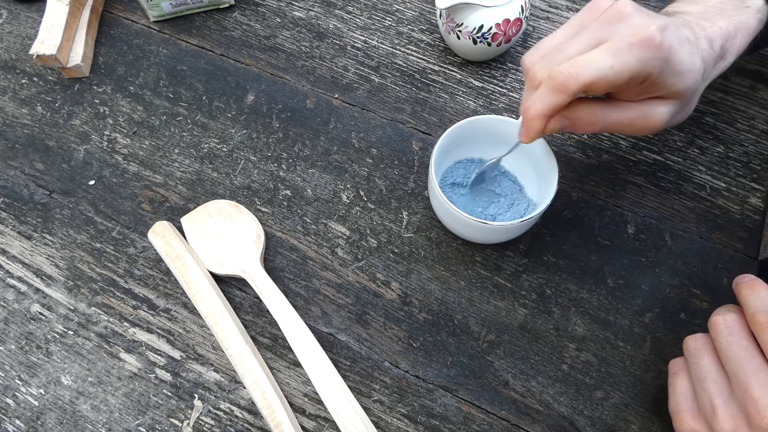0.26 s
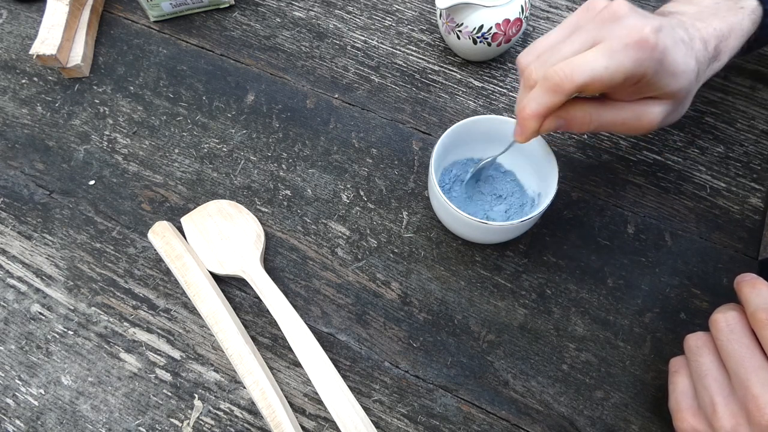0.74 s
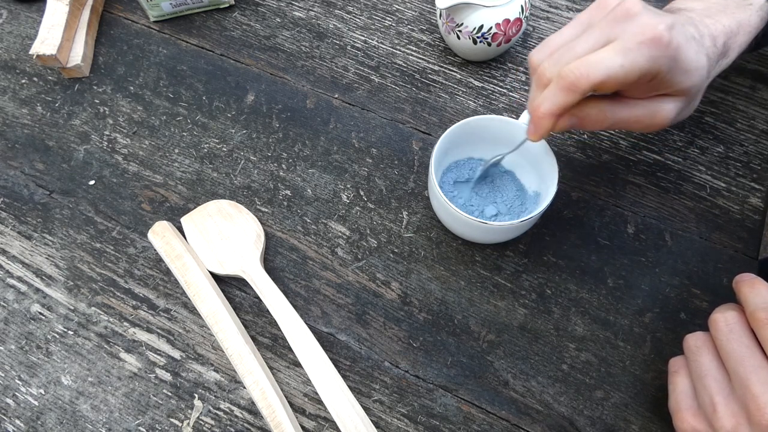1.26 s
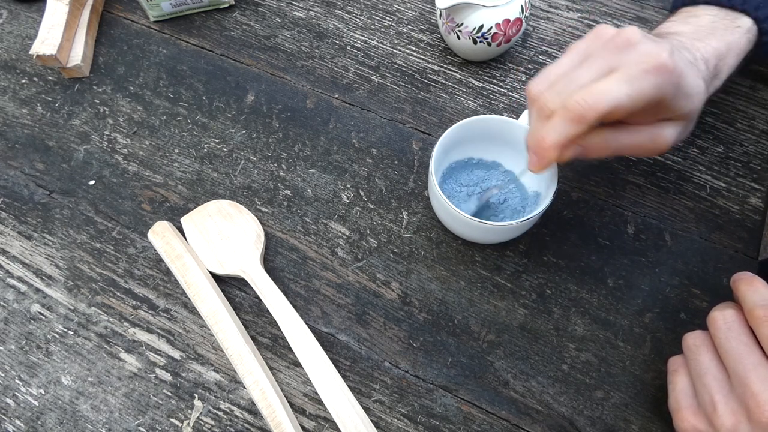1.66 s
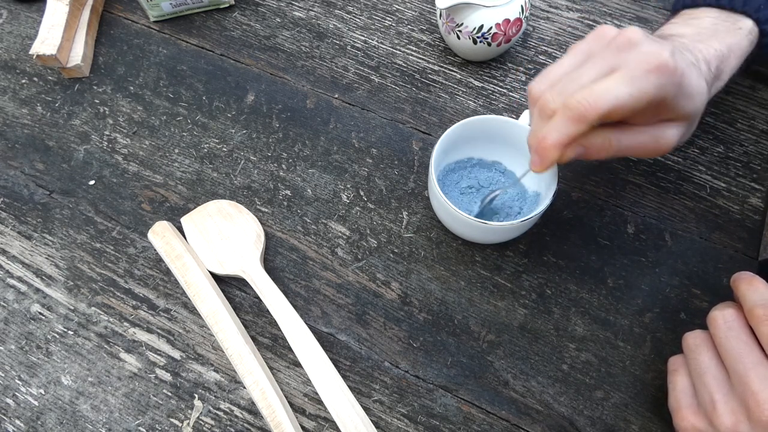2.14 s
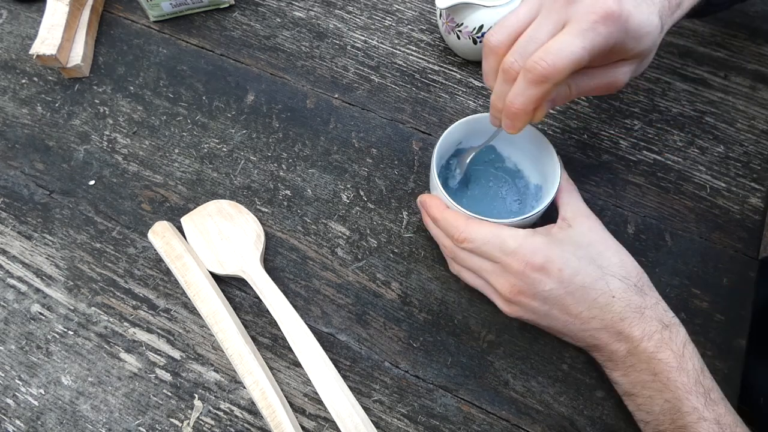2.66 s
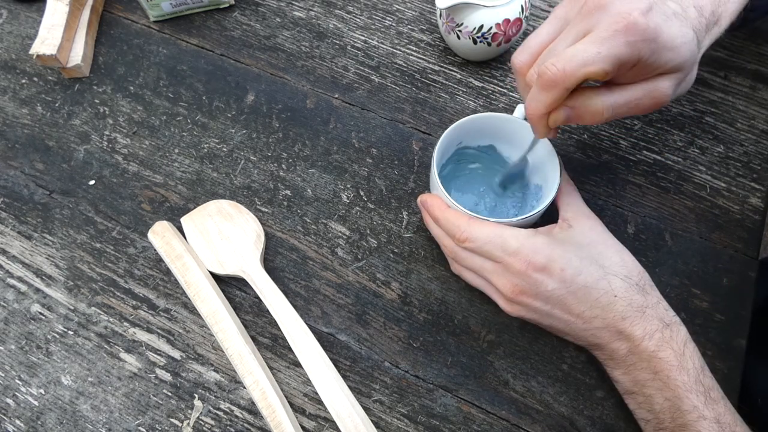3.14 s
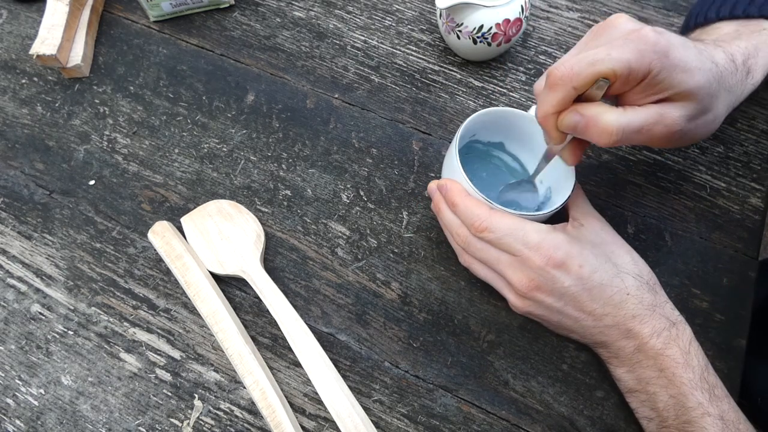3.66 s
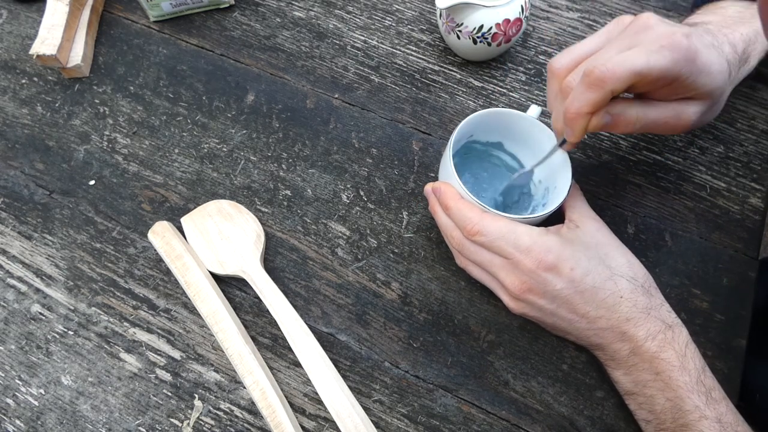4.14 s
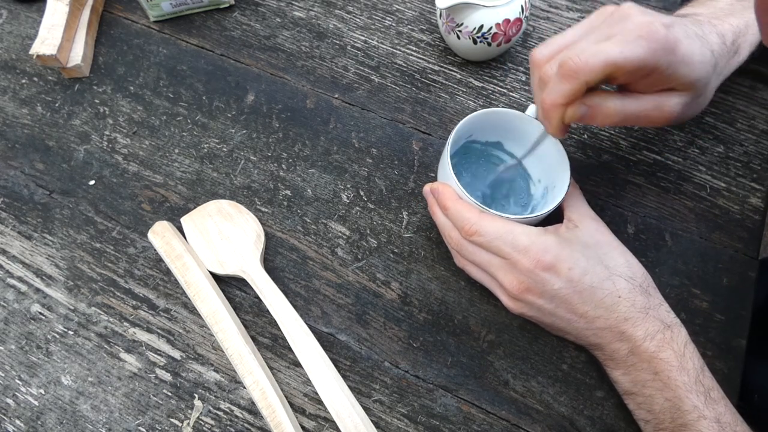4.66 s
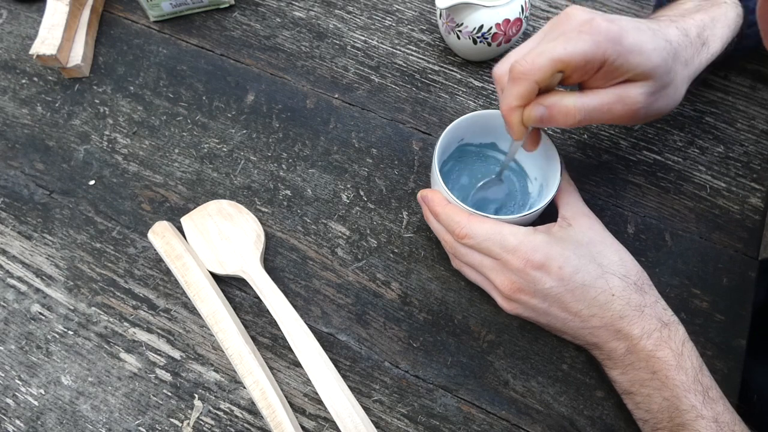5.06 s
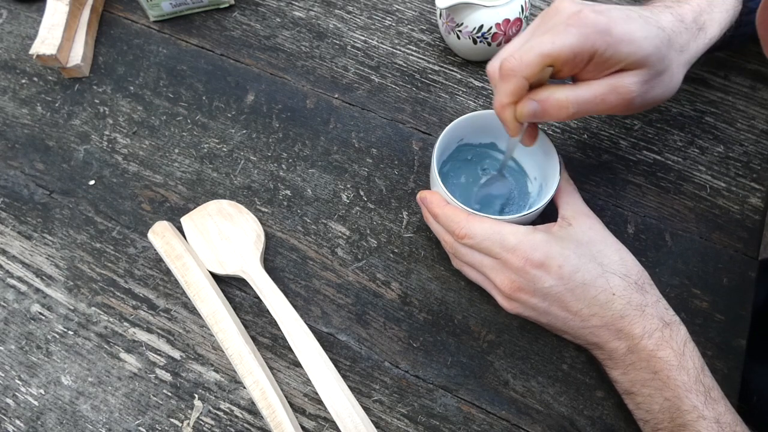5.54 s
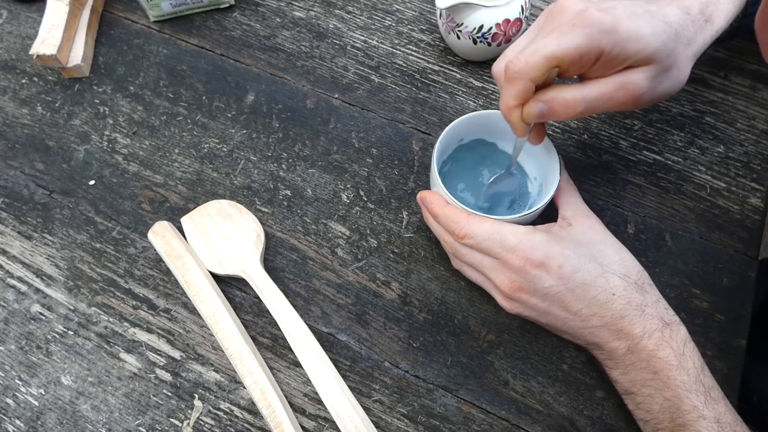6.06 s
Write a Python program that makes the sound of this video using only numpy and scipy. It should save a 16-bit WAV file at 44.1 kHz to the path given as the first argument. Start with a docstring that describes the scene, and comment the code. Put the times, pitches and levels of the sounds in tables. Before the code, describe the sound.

Dry, crisp scraping of a spoon in a china cup, about eight strokes a second, gives way to slower wet scraping and a few strong clinks damped by a holding hand. Small woody thumps come from the cup rocking on the table. A warbler sings clear, quick descending notes in the middle, then soft regular stirring returns. Near stereo pickup in a quiet garden, with faint distant engine drone.

```python
"""In a garden, a steel teaspoon stirs powder into a paste in a small china cup on a wooden table.
Random clicks of grit, shaped by moving resonances, make the spoon rasp and sing to and fro.
Gliding tones squeak, filtered noise skates and skids, and damped sines clink and knock on the boards.
A warbler of gliding sine notes sings one falling phrase over a faint outdoor rumble and engine drone."""
import sys
import numpy as np
from scipy import signal
from scipy.fft import rfft, irfft
from scipy.io import wavfile
from scipy.ndimage import uniform_filter1d

SR = 44100
rng = np.random.default_rng(int(sys.argv[2]) if len(sys.argv) > 2 else 0)


def int16_out(signal):
    """Quantize to a 16-bit WAV file."""
    q = np.round(np.clip(np.atleast_2d(signal).T, -1, 1) * 32767)
    wavfile.write(sys.argv[1], SR, q.astype(np.int16))


N = 278120

TIME = np.arange(N) / SR
AGE = np.arange(SR // 3) / SR   # seconds since a blow
WETTED_S = 2.53   # from here on the powder is a paste
GRIP_S = 2.7   # a hand closes round the cup and steadies it
# ways the cup's foot vibrates on the boards: (pitch_hz, relative level_db, time to fall 60 dB_s)
FOOT_MODES = [(1089, 5, 0.014), (1276, 7, 0.012), (1648, 4, 0.0056), (1228, -11.5, 0.046)]


def stirring(stirs):
    """Every stroke crushes grit, makes the spoon sing and the cup's foot chatter on the table."""
    # single scrapes outside the even beat, hard and soft: (middle_s, level_db, half_length_s)
    scrapes = [(0.0, -54, 0.012), (0.89, -55, 0.022), (1.473, -59, 0.0071), (1.972, -52, 0.029),
               (2.185, -58, 0.043), (2.523, -53.5, 0.03), (2.821, -52.5, 0.035), (2.973, -49.5, 0.005),
               (3.138, -57, 0.012), (3.209, -46.5, 0.012), (3.436, -63.5, 0.021), (3.69, -62.5, 0.051),
               (4.137, -62, 0.06), (4.453, -57, 0.021), (6.144, -63, 0.012)]
    # steady drag between the strokes: (time_s, level_db)
    drag = [(0.0, -63.5), (0.9, -68), (1.35, -54), (1.7, -62.5), (2.1, -66), (2.7, -72), (3.15, -58),
            (3.55, -63.5), (3.9, -72.5), (4.5, -69), (5.2, -69.5), (6.1, -67.5), (6.31, -72.5)]
    # rasp of dry powder and of wet paste: (pitch_hz, relative level_db per Hz)
    powder = [(1500, -3.5), (2100, -0.5), (2950, 3.5), (3600, -2), (4650, 4), (5300, 1.5), (6100, -0.5),
              (7300, -6), (9800, -3), (11200, -11.5), (12400, -4), (14000, -42), (16000, -42)]
    paste = [(1500, 0), (2200, 4.5), (3000, 0.5), (3800, 0), (4700, 5.5), (5400, 3.5), (6400, 3.5),
             (7700, -4), (9800, -1), (12300, -10), (14000, -16), (16000, -35)]
    # resonances of the spoon in dry powder, then in paste: (pitch_hz, width_hz, relative level_db)
    dry_push = [(4580, 250, 0.5), (5800, 230, 0.5), (10100, 600, -8)]
    dry_pull = [(2870, 240, 4.5), (4420, 610, -1.5), (6070, 140, -1.5), (12400, 380, -6.5)]
    wet_push = [(2840, 310, 1), (4520, 620, -0.5), (5840, 470, 2), (9500, 1000, -0.5)]
    wet_pull = [(2110, 340, 1), (2900, 230, 6), (4520, 400, -5), (6380, 600, -2), (8640, 400, -8)]
    power = np.zeros((2, N))   # of pulls and of pushes; a scrape is half of each
    for s, db, rise, fall, pushed in stirs:
        power[pushed] += swell(s, db, rise, fall)
    for s, db, half_length in scrapes:
        power += swell(s, db, half_length, half_length) / 2
    stroke_level = np.sqrt(power.sum(axis=0))
    wet = np.clip((TIME - WETTED_S) * 10, 0, 1)
    dry = 1 - wet

    grit = patchy(grains(per_s=6000, spread_db=3.8))
    rasp = dry * from_db(-4.5) * colour(grit, powder) + wet * from_db(-3.0) * colour(grit, paste)
    grinding = np.sqrt(power.sum(axis=0) + from_db(in_time(drag)[0]) ** 2)
    rasp *= grinding * from_db(2.1 * drift(150))

    # the boards rumble as dry powder is ground
    rumble = rms_one(band(grains(per_s=670, spread_db=1.0), 162, 385)) * grinding * from_db(-5.5) * dry

    pull, push = np.sqrt(power)
    slips = grains(per_s=1500, spread_db=1.5)
    dry_singing = push * resonate(slips, dry_push) + pull * resonate(slips, dry_pull)
    wet_singing = push * resonate(slips, wet_push) + pull * resonate(slips, wet_pull)
    singing = dry * from_db(-4.5) * dry_singing + wet * from_db(-2) * wet_singing

    # the foot chatters at chatter_db under a stroke of firm_db; growth is in dB per dB of stroke
    chatter_db, firm_db, growth = -55.5, -53, 1.23
    chatter = rms_one(signal.fftconvolve(grains(per_s=900, spread_db=6.5), struck(FOOT_MODES))[:N])
    force = stroke_level / from_db(firm_db)
    return rasp + singing + rumble + chatter * from_db(chatter_db) * force ** growth


def strokes():
    """Even strokes, pull and push in turn: rows of (s, level dB, rise s, fall s, 1 if pushed)."""
    # spells of even stirring: (first_stroke_s, end_s, period_s, level_db, rise_s, pull_fall_s, push_fall_s)
    spells = [(0.142, 2.2, .1235, -55.5, 0.031, 0.02, 0.027), (4.769, 6.14, .119, -56, 0.04, 0.0018, 0.011)]
    push_softer_db, spread_db = 0.04, .5
    rows = []
    for first, end, period, db, rise, pull_fall, push_fall in spells:
        for k, s in enumerate(np.arange(first, end, period)):
            pushed = k % 2
            level_db = db - push_softer_db * pushed + spread_db * rng.standard_normal()
            rows.append((s, level_db, rise, push_fall if pushed else pull_fall, pushed))
    return rows


def swell(s, db, rise, fall):
    """Power of one movement of the spoon: a bell with its own rise and fall."""
    distance = (TIME - s) / np.where(TIME < s, rise, fall)
    return from_db(db) ** 2 * np.exp(-np.minimum(distance ** 2, 50))


def grains(per_s, spread_db):
    """Grit cracking under the spoon: random clicks of uneven size."""
    sizes = from_db(spread_db * np.minimum(rng.exponential(1, N), 4)) * rng.choice([-1, 1], N)
    return sizes * (rng.random(N) < per_s / SR)


def patchy(x):
    """Each band of the rasp swells and fades by itself as lumps break up."""
    edges_hz = [900, 2000, 3400, 5200, 7200, 9200, 11400, 17000]
    spread_db, changes_per_s = 2.6, 60
    out = np.zeros(N)
    for k, (low, high) in enumerate(zip(edges_hz, edges_hz[1:])):
        out += band(x, low, high) * from_db(spread_db * drift(changes_per_s)) * (-1) ** k
    return out


def resonate(x, resonances):
    """Parallel resonances wander, swell and fade as the point of contact moves; rms 1."""
    shift = 1 + 0.022 * drift(22)
    out = np.zeros(N)
    for hz, width, db in resonances:
        out += sweep(x, hz * shift, width) * from_db(db + 4 * drift(35))
    return rms_one(out)


def clinks():
    """Hits and light touches of the spoon on the wall, each struck afresh."""
    # (start_s, tick_level_db, tick_pitch_hz, ting_level_db, ting_pitch_hz, ting time to fall 60 dB_s,
    # ring_level_db); the levels are before the blend in clink()
    contacts = [(0.008, -52.5, 4500, -65, 5800, .008, -73), (0.1482, -69, 2970, -60, 6100, .04, -86),
                (0.2505, -71, 4600, -50.5, 6100, .008, -80), (0.3072, -59, 3030, -51, 5900, .008, -72),
                (0.378, -56, 2980, -58, 6140, 0.083, -71), (0.474, -54.5, 2880, -56, 6250, .008, -77),
                (0.746, -64, 4600, -56, 6000, .03, -80), (0.998, -49, 4770, -51, 6300, 0.013, -87),
                (1.223, -42.5, 2700, -51, 5500, .008, -83), (1.2333, -44.5, 4600, -52, 6030, 0.013, -68),
                (1.5033, -37.5, 4760, -38.5, 4790, 0.014, -70),
                (1.9015, -29.5, 3840, -40, 5000, 0.013, -52.5),
                (2.1096, -34, 4700, -35, 6060, 0.044, -60.5), (2.4284, -53, 3000, -71, 6050, .01, -76),
                (2.663, -37.5, 4880, -37.5, 6730, 0.015, -89), (2.7004, -53, 3070, -47.5, 5060, 0.01, -82),
                (2.8113, -40, 4000, -48, 6070, .006, -61), (2.9718, -46.5, 3040, -48, 6040, 0.013, -68),
                (3.15, -30.5, 3170, -29, 6140, 0.022, -49), (4.178, -57, 4600, -59, 5600, .008, -86),
                (4.357, -20.5, 3050, -19, 6120, 0.03, -43.5), (4.618, -19, 4250, -27.5, 6000, .012, -38.5),
                (6.0245, -43, 4720, -51, 6040, 0.011, -80)]
    out = np.zeros((2, N))
    for row in contacts:
        add(out, row[0], clink(*row))
    return out


def clink(s, tick_db, tick_hz, ting_db, ting_hz, ting_t60, ring_db):
    """One contact ticks the spoon and rings the china, as sets of damped sines and noise."""
    # The next four tables: (pitch_hz, relative level_db, time to fall 60 dB_s). the spoon's quick ting, above
    # its main note
    ting_modes = [(6750, 4.5, 0.0055), (9080, -1.5, 0.0063), (9280, -10, 0.02), (10680, -1, 0.0064),
                  (12750, -16.5, 0.0062)]
    # the spoon's own ringing
    spoon_modes = [(2960, -17, .12), (4130, -14, .1), (4667, -12, .12), (6088, 0, .2), (6150, -6, .12),
                   (6750, -14, .08)]
    # lasting ring of the free-standing cup
    free_modes = [(2455, -2, .45), (5582, 2, .56), (8742, 2, .22), (10600, -26, .25)]
    # duller, shorter ring of the cup in a hand
    held_modes = [(2466, -5, .2), (2535, -3, .11), (2590, 2, .06), (2380, -5, .05), (2640, 0, .04),
                  (2690, -5, .1), (2960, -14, .2), (4097, -15, .15), (5582, -14, .18), (6110, -7, .06),
                  (6713, -7, .08), (8742, -2, .09), (9050, -9, .07), (10100, -19, .1), (11600, -18, .09)]
    # the spoon's bowl is damped within milliseconds by the wall that it presses on
    bowl = struck([(tick_hz, 0, .01), (1900, -12, .005), (2700, -11, .01), (3900, -8, .006), (4900, -9, .007)])
    tick = from_db(-4.5) * bowl + from_db(-4.0) * burst(1880, 5830, t60=0.0021)[0]
    tick = band(tick, 970, 13000)   # keep the tick bright, without low sound

    ting = from_db(-4.0) * struck([(ting_hz, 12.5, ting_t60)] + ting_modes)
    ting += from_db(-10.0) * burst(5300, 13600, t60=0.0066)[0]
    spoon_db = -22 if s > WETTED_S else -25   # dry powder damps the spoon
    ting += from_db(spoon_db) * struck(spoon_modes)

    wall = struck(held_modes) if s > GRIP_S else struck(free_modes) * from_db(-1.0)
    return from_db(tick_db) * tick + from_db(ting_db) * ting + from_db(ring_db + 6.5) * wall


def squeaks():
    """The spoon sticks and slips: tones swell and die, falling as it slows; slow slips are richer."""
    # (start_s, length_s, first_pitch_hz, last_pitch_hz, level_db)
    slips = [(2.101, 0.011, 3102, 1486, -31), (2.107, 0.0068, 2407, 1360, -28),
             (2.511, 0.021, 4180, 3540, -35), (2.539, 0.013, 3030, 1690, -46.5),
             (2.778, 0.014, 4320, 4000, -45), (2.811, 0.02, 4090, 3220, -42),
             (2.826, 0.015, 3244, 2720, -28.5)]
    waver, firm_db = 0.021, -27.5   # unsteadiness of pitch (share); lighter squeaks are less steady
    tilt_db_per_khz = 3   # fall of the overtones
    out = np.zeros((2, N))
    for s, length, first_hz, last_hz, db in slips:
        u = progress(length)
        pitch = first_hz + (last_hz - first_hz) * u
        phase = glide(pitch, waver * from_db((firm_db - db) / 2))
        tone = np.zeros(len(u))
        for k in range(1, 5):
            tone += from_db(-tilt_db_per_khz * (k - 1) * pitch / 1000) * np.sin(k * phase)
        add(out, s, np.sqrt(2) * from_db(db) * np.sin(np.pi * u) ** 2 * tone)
    return out


def slides(stirs):
    """Friction noise: the spoon skates on glaze, digs in and zips out; the cup skids on the boards."""
    # the bowl's edge skates over the glaze: (start_s, length_s, first_pitch_hz, last_pitch_hz, level_db)
    skates = [(.485, 0.061, 4700, 4450, -60), (1.098, .1, 2870, 2700, -59.5),
              (1.36, 0.089, 2880, 2730, -64), (1.708, 0.093, 4770, 4430, -56),
              (1.947, 0.097, 4850, 4520, -57), (2.521, 0.031, 3680, 2600, -53.5),
              (2.788, 0.026, 3860, 4100, -47), (2.821, .075, 3050, 2950, -55.5),
              (3.688, 0.068, 4200, 3970, -52.5), (6.199, 0.13, 2730, 2180, -65.5)]
    # the cup's foot skids, often just before it rocks: (start_s, length_s, level_db)
    skids = [(0.883, .025, -57), (0.962, 0.024, -48.5), (0.979, .04, -52), (1.202, 0.013, -45.5),
             (1.439, 0.033, -50), (1.468, 0.015, -57), (1.726, 0.046, -53.5), (1.869, 0.015, -47.5),
             (3.196, 0.028, -44.5), (5.492, 0.012, -53)]
    smooth_s = 4.9   # from here on the paste is smooth enough to zip
    out = np.zeros((2, N))
    for s, length, first_hz, last_hz, db in skates:
        add(out, s, swish(length, first_hz, last_hz, width_hz=310, db=db))
    for s, length, db in skids:
        add(out, s, swish(length, first_hz=1360, last_hz=1134, width_hz=93, db=db))
    for s, *_, pushed in stirs:
        if s < WETTED_S and not pushed:   # a pull hisses downwards as the bowl digs into dry powder
            add(out, s - .066, swish(0.086, first_hz=9040, last_hz=4470, width_hz=2500, db=-65))
        if s > smooth_s and not pushed:   # a short bright zip as the spoon bares the glaze
            add(out, s - 0.025, swish(0.033, first_hz=6550, last_hz=5870, width_hz=630, db=-54))
    return out


def swish(length_s, first_hz, last_hz, width_hz, db):
    """Friction, as noise, feeds one gliding resonance, which swells and dies."""
    u = progress(length_s)
    ringing = sweep(rng.standard_normal(len(u)), first_hz + (last_hz - first_hz) * u, width_hz)
    return from_db(db) * np.sqrt(.5) * rms_one(np.sin(np.pi * u) * ringing)


def crackles():
    """Tiny bubbles burst where wet paste tears off the spoon: bright filtered clicks."""
    # (start_s, length_s, level_db)
    tears = [(3.385, 0.017, -62), (3.432, 0.011, -60), (3.485, .06, -63.5), (4.17, 0.019, -61)]
    out = np.zeros((2, N))
    for s, length, db in tears:
        u = progress(length)
        pops = band(grains(per_s=2500, spread_db=7.0)[:len(u)], 8400, 12960)
        add(out, s, from_db(db) * rms_one(np.sin(np.pi * u) * pops))
    return out


def knocks():
    """The rocking cup's foot lands with a small crack and sets the boards thumping."""
    # (start_s, foot_level_db, thump_level_db), before the blend below
    landings = [(1.2087, -55, -53), (1.233, -40, -50), (1.478, -48, -53.5), (1.503, -32, -44),
                (1.9011, -35, -47), (2.4283, -54.5, -50), (2.7007, -44.5, -44), (2.7742, -53, -51),
                (2.9704, -47, -42), (3.15, -26, -35.5), (4.082, -56, -50.5), (4.357, -46.5, -50),
                (4.6176, -47, -46.5), (4.8125, -30, -40.5), (5.053, -36, -47), (5.523, -50.5, -50),
                (5.7606, -44.5, -46), (5.805, -48, -46.5), (6.0245, -28, -34.5)]
    # ways the table boards vibrate: (pitch_hz, relative level_db, time to fall 60 dB_s)
    board_modes = [(193.8, -13, 0.23), (295.6, -11, 0.096), (433, -6.5, 0.16), (536, -5.5, 0.15),
                   (603, -2.5, 0.028), (792, 2.5, 0.03), (1243, -20.5, 0.16)]
    out = np.zeros((2, N))
    for s, knock_db, thump_db in landings:
        boards = from_db(-0.5) * struck(board_modes)
        boards = boards + from_db(-3.0) * burst(260, 890, t60=0.037)
        boards += from_db(-3.5) * burst(202, 810, t60=0.17)
        if s < GRIP_S:   # until a hand steadies the cup, its knocks have a deeper body
            boards += from_db(0.5) * burst(213, 327, t60=0.11)
        crack = from_db(-16.0) * burst(1000, 3700, t60=0.013)[0]
        foot = from_db(knock_db - 2.0) * struck(FOOT_MODES)
        add(out, s, from_db(thump_db) * (boards + crack) + foot)
    return out


def warbler():
    """A falling phrase of gliding sines, smeared by reflections from trees and walls."""
    # opening and closing whistles, before the blend below:
    # (start_s, length_s, first_pitch_hz, last_pitch_hz, middle_arch_hz, level_db)
    whistles = [(2.791, 0.11, 9030, 7770, 457, -47.5), (2.944, 0.18, 7560, 7510, -31.5, -53),
                (3.097, 0.16, 7390, 7330, -21.5, -50.5), (3.271, 0.02, 4730, 6700, 200, -53),
                (3.287, 0.077, 6150, 6096, -330, -38.5), (3.418, 0.02, 4970, 6550, 150, -49.5),
                (3.433, 0.081, 5940, 6036, -130, -40), (3.54, 0.028, 4870, 5000, 7, -60),
                (4.709, 0.039, 4730, 4060, -120, -50.5), (4.826, 0.069, 4520, 4060, -170, -49),
                (4.894, 0.089, 4450, 4570, 71, -45)]
    # the like notes between, each held and then flicked upwards: (start_s, held_pitch_hz, flick_hz, level_db)
    slurs = [(3.566, 5046, 232, -44.5), (3.683, 4940, 350, -41.5), (3.806, 4930, 170, -39.5),
             (3.933, 4910, 140, -43), (4.062, 4906, 190, -43), (4.198, 4777, 462, -41.5),
             (4.362, 4720, 330, -42.5)]
    slur_s, climb_hz = .092, 137   # length; slow climb of the held part
    flick_at, flick_span = .68, .08   # when the flick comes and how gradual it is (shares of the note)
    song = np.zeros((1, N))
    for s, length, first_hz, last_hz, arch_hz, db in whistles:
        u = progress(length)
        add(song, s, note(first_hz + (last_hz - first_hz) * u + arch_hz * np.sin(np.pi * u), db))
    for s, hz, flick_hz, db in slurs:
        u = progress(slur_s)
        flick = (1 + np.tanh((u - flick_at) / flick_span)) / 2
        add(song, s, note(hz + climb_hz * u + flick_hz * flick, db, fade=0.44))
    shared, apart = echoes(song, t60=0.4, delay_s=0.011)
    opposed = apart * [[1], [-1]]   # opposite signs left and right widen the echo
    return pan(from_db(-2.0) * song + from_db(-3.5) * shared + from_db(-15.5) * opposed, -1.8)


def note(pitch, db, fade=0.27):
    """One nearly pure note of the bird; fade is the share spent fading in and out."""
    waver = 0.0097 if pitch.mean() < 4750 else 0.006   # low notes are burry
    phase = glide(pitch, waver)
    return np.sqrt(2) * from_db(db) * signal.windows.tukey(len(pitch), fade) * np.sin(phase)


def garden():
    """Far traffic and leaves as shaped noise, with a distant engine's low drone of two sines."""
    # outdoor background: (pitch_hz, relative level_db per Hz)
    air_spectrum = [(25, -32), (45, -20), (90, -4), (220, 0), (330, -6), (650, -7), (1200, -10),
                    (1650, -18), (2500, -19), (3300, -26), (7000, -35), (12500, -40), (16000, -52)]
    # how alike left and right are: (pitch_hz, likeness from 0 to 1)
    likeness = [(40, 0.15), (100, 0.57), (500, 0.62), (1200, 0.46), (4000, 0.55), (14000, 0.39)]
    # the engine's loudness: (time_s, level_db)
    drone_level = [(0.0, -77), (0.35, -61), (.6, -66), (1.1, -80), (1.33, -63), (1.78, -63.5),
                   (1.95, -82.5), (4.92, -74), (5.57, -75), (6.31, -70)]
    mid, side = rfft(rng.standard_normal((2, N)))
    alike = np.clip(at_hz(likeness, np.fft.rfftfreq(N, 1 / SR)), 0, 1)
    both = np.sqrt(1 + alike) * mid + np.sqrt(1 - alike) * side * [[1], [-1]]
    air = colour(irfft(both, N), air_spectrum) * from_db(-54)
    drone_hz = 71.5 * (1 + .02 * drift(12.0))
    phase = 2 * np.pi * np.cumsum(drone_hz) / SR
    engine = np.sin(phase) + from_db(-3.5) * np.sin(1.5 * phase)   # and a tone half as high again
    return pan(air + rms_one(engine) * from_db(in_time(drone_level)[0]), 0.45)


def soften(x, hz):
    """Dull the top of the hits and remove their deep bass."""
    dull = signal.sosfilt(signal.butter(4, min(hz, SR / 2 - 1000), fs=SR, output="sos"), x)
    return signal.sosfilt(signal.butter(2, 110, "high", fs=SR, output="sos"), dull)


def ports(x):
    """Two microphone ports on one small body hear a near source with different level and phase."""
    # left above right: (pitch_hz, difference_db)
    port_db = [(60, -1.5), (110, 4), (230, 0), (450, 4.5), (700, 1), (1290, -5), (2380, -4.5), (4400, -1),
               (8120, -2), (15000, -0.5)]
    # left ahead of right: (pitch_hz, lead in radians)
    port_phase = [(100, -0.091), (430, 0.53), (860, -0.26), (3000, 0.36), (6500, -0.59), (9000, 1),
                  (16000, 0.98)]
    hz = np.fft.rfftfreq(N, 1 / SR)
    half = from_db(at_hz(port_db, hz) / 2) * np.exp(.5j * at_hz(port_phase, hz))
    return irfft(rfft(x) * np.array([half, 1 / half]), N)


def echoes(x, t60, delay_s):
    """Diffuse reflections of unit energy, unlike in the two channels."""
    t = TIME[:SR]
    tail = rng.standard_normal((2, SR)) * from_db(-60 * t / t60) * (t > delay_s)
    return signal.fftconvolve(np.atleast_2d(x), rms_one(tail) / np.sqrt(SR), axes=1)[:, :N]


def struck(modes):
    """Damped sines whose strengths change a little from blow to blow."""
    hz, db, t60 = np.transpose(modes)[:, :, None]
    gain = from_db(db + rng.standard_normal(db.shape) - 60 * AGE / t60)
    signs = (-1) ** np.arange(len(modes))[:, None]
    return unit_blow(np.sum(gain * np.sin(2 * np.pi * hz * AGE) * signs, axis=0))


def burst(low_hz, high_hz, t60):
    """Many dense modes dying together, as fading noise unlike in the two channels."""
    noise = rng.standard_normal((2, len(AGE))) * from_db(-60 * AGE / t60)
    return unit_blow(band(noise, low_hz, high_hz))


def sweep(x, hz, width_hz):
    """One steep-sided resonance whose centre moves from sample to sample; rms 1."""
    turn = np.exp(2j * np.pi * np.cumsum(hz) / SR)
    r = np.exp(-1.5 * np.pi * width_hz / SR)
    # shift the centre down to zero, filter there, and shift back up
    return rms_one((turn * signal.lfilter([1], [1, -2 * r, r * r], x / turn)).real)


def glide(pitch, waver):
    """Phase of a tone that follows a pitch, a little unsteadily."""
    wobble = rms_one(uniform_filter1d(rng.standard_normal(len(pitch)), size=60))
    return 2 * np.pi * np.cumsum(pitch * (1 + waver * wobble)) / SR


def progress(length_s):
    """Runs from 0 to 1 over an event."""
    return np.linspace(0, 1, int(length_s * SR))


def drift(rate):
    """Slow random wandering of spread 1, through this many random points per second."""
    knots = rng.standard_normal(int(N / SR * rate) + 2)
    return rms_one(np.interp(TIME * rate, np.arange(len(knots)), knots))


def colour(x, spectrum):
    """Give a steady sound a spectrum; rms 1."""
    return rms_one(irfft(rfft(x) * from_db(at_hz(spectrum, np.fft.rfftfreq(N, 1 / SR))), N))


def band(x, low_hz, high_hz):
    """Keep the sound between two pitches."""
    return signal.sosfilt(signal.butter(2, [low_hz, min(high_hz, SR / 2 - 1000)], "band", fs=SR, output="sos"), x)


def at_hz(points, hz):
    """Read a spectrum on a log-frequency axis."""
    return np.interp(np.log(hz + 1), np.log(np.array(points)[:, 0]), np.array(points)[:, 1])


def in_time(rows):
    """Columns of a curve at every sample."""
    s, *columns = np.transpose(rows)
    return [np.interp(TIME, s, c) for c in columns]


def from_db(db):
    """Decibels to gain."""
    return 10 ** (np.asarray(db) / 20)


def rms_one(x):
    """Scale to unit rms (average strength)."""
    return x / np.sqrt(np.mean(x ** 2) + 1e-20)


def unit_blow(x):
    """Scale a blow to unit rms over its first 12 ms."""
    return x / np.sqrt(np.mean(x[..., :int(.012 * SR)] ** 2) + 1e-20)


def pan(x, left_db):
    """Place a sound between the channels; left_db is left above right."""
    return x * from_db([[left_db / 2], [-left_db / 2]])


def add(out, s, x):
    """Mix a sound in at a given time."""
    i = int(s * SR)
    out[:, i:i + x.shape[-1]] += x[..., :N - i]


def scene():
    """The cup close by, with weak reflections from the table and its surroundings."""
    stirs = strokes()
    contacts = soften(clinks() + knocks() + crackles(), hz=11300)
    cup = ports(stirring(stirs) + contacts + squeaks() + slides(stirs))
    table_echo = from_db(-11.0) * echoes(cup, t60=0.026, delay_s=0.00033)
    garden_echo = from_db(-19.0) * echoes(cup, t60=0.3, delay_s=0.0093)
    return cup + table_echo + garden_echo + warbler() + garden()


def record(dry):
    """The hardest peaks are rounded and the top is cut steeply at 16 kHz."""
    rounded = .9 * np.tanh(dry / .9)
    return signal.sosfilt(signal.ellip(10, .1, 80, 16000, fs=SR, output="sos"), rounded)


dry = scene()
out = record(dry)
int16_out(out)
```